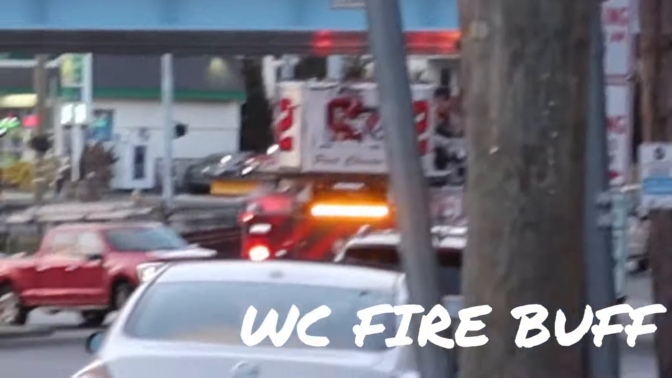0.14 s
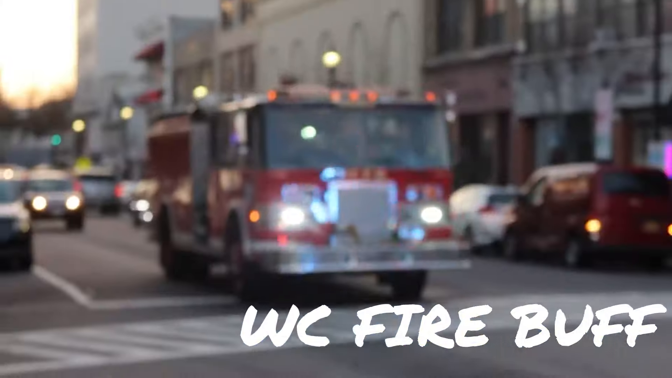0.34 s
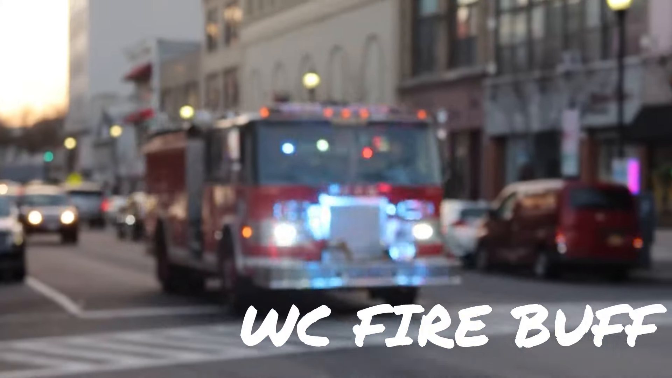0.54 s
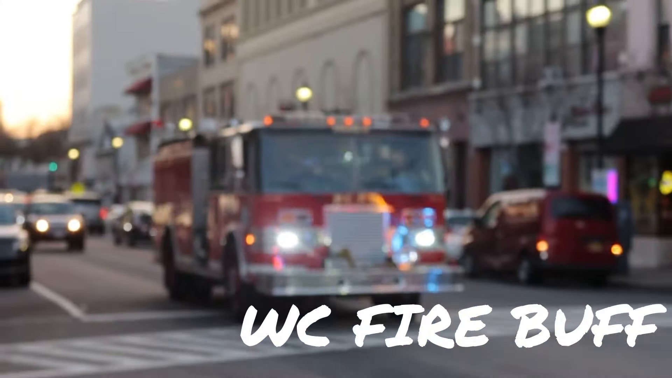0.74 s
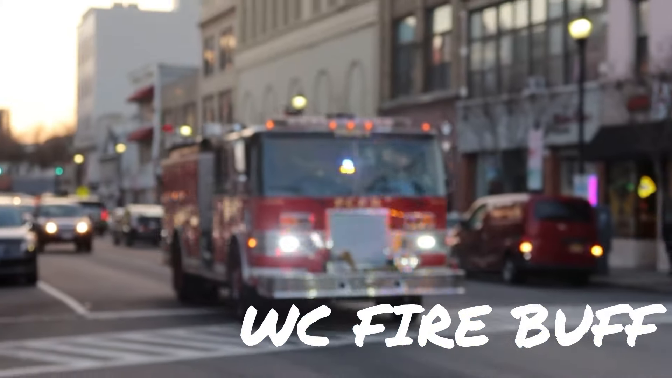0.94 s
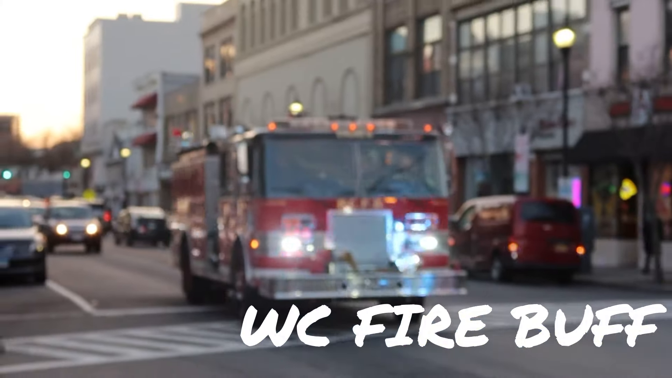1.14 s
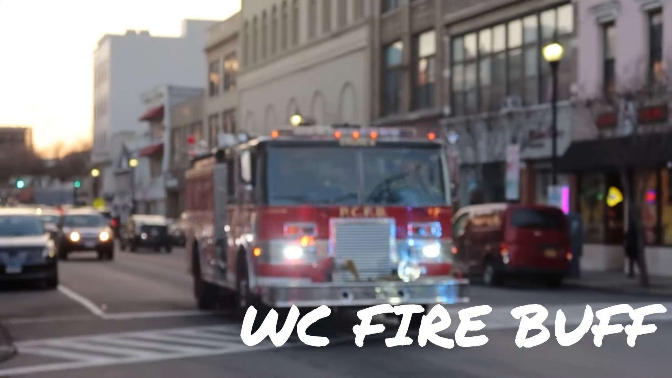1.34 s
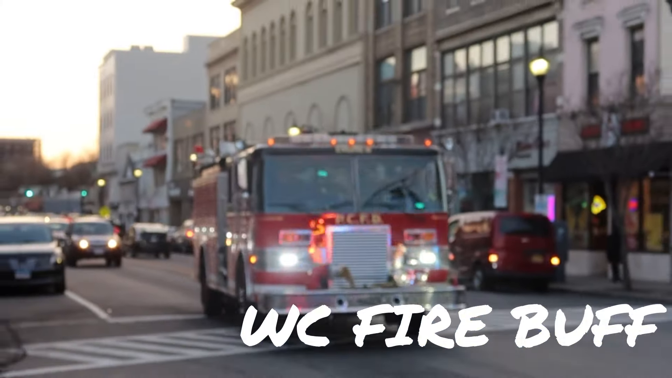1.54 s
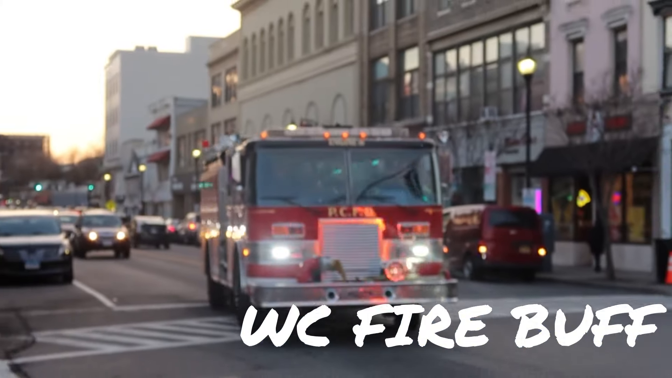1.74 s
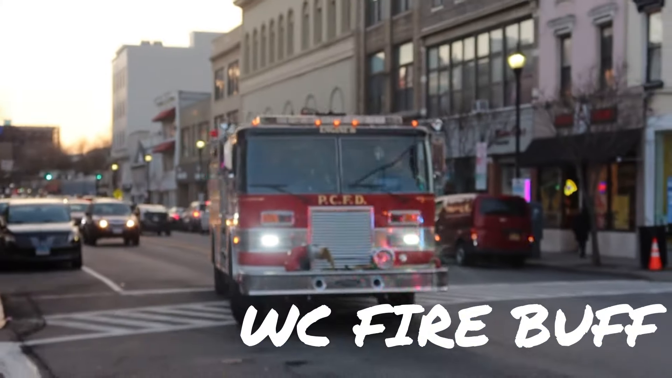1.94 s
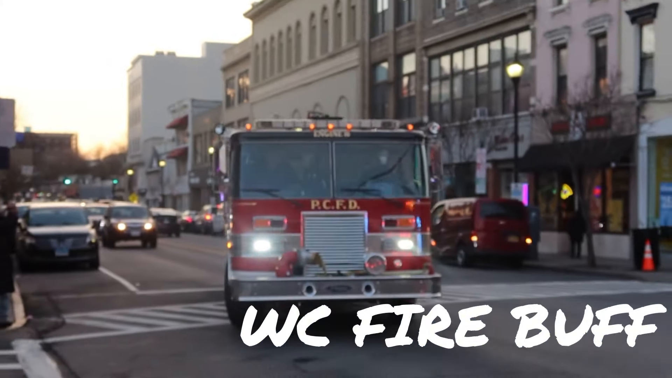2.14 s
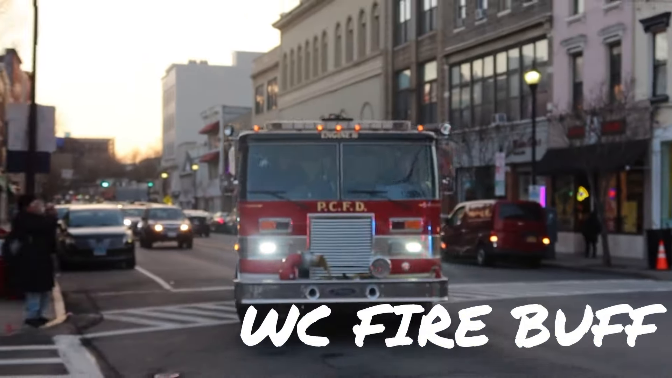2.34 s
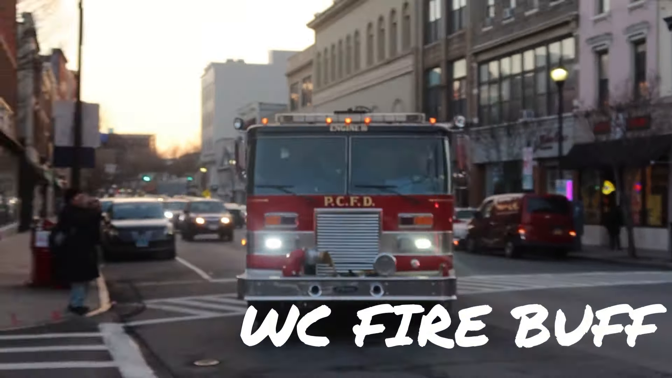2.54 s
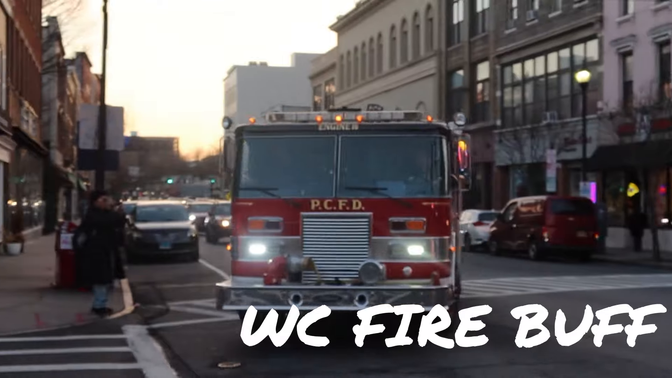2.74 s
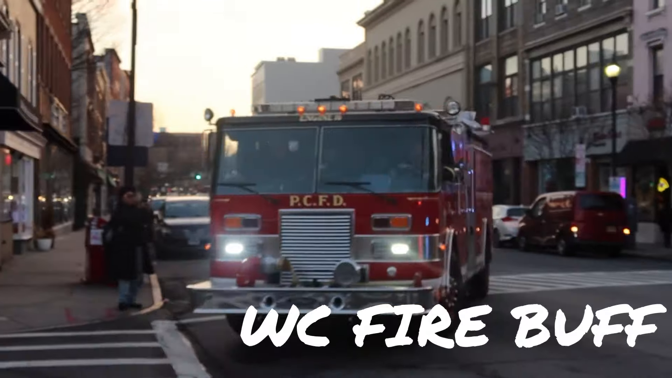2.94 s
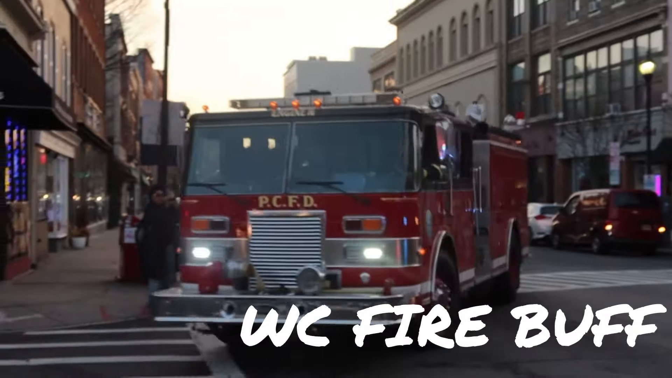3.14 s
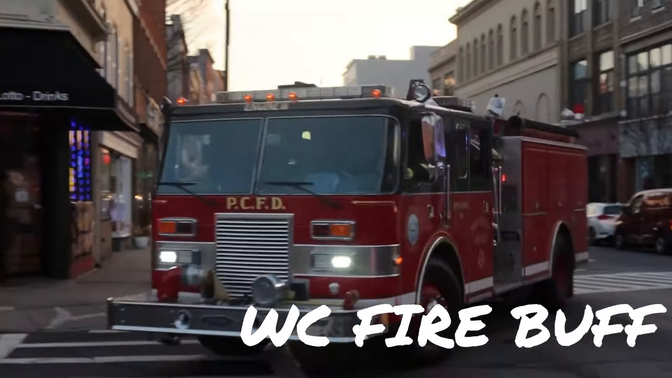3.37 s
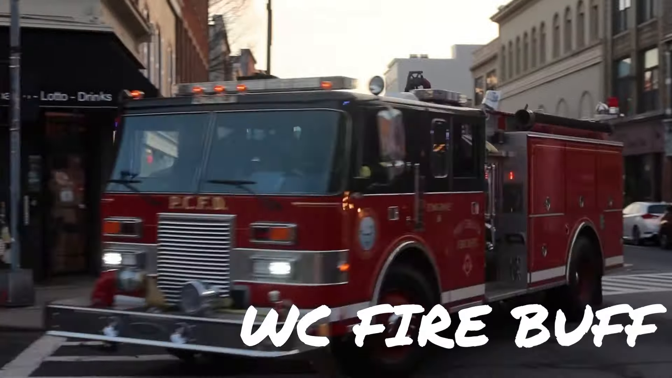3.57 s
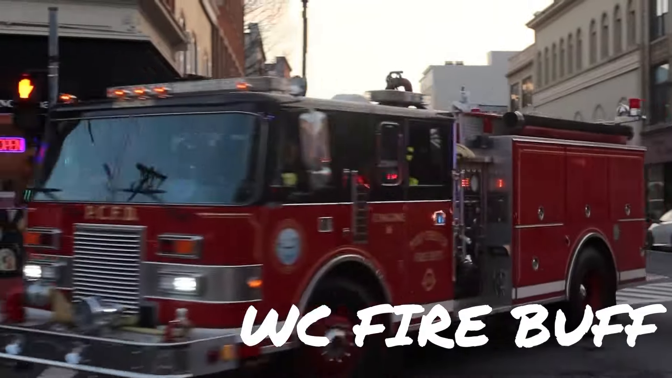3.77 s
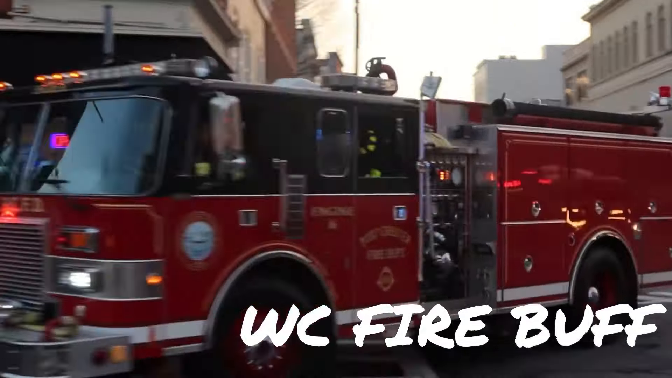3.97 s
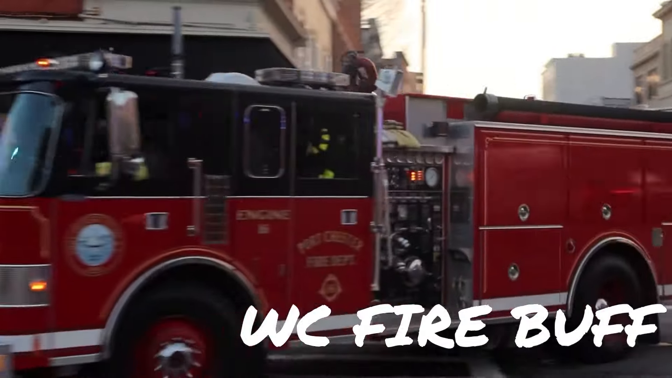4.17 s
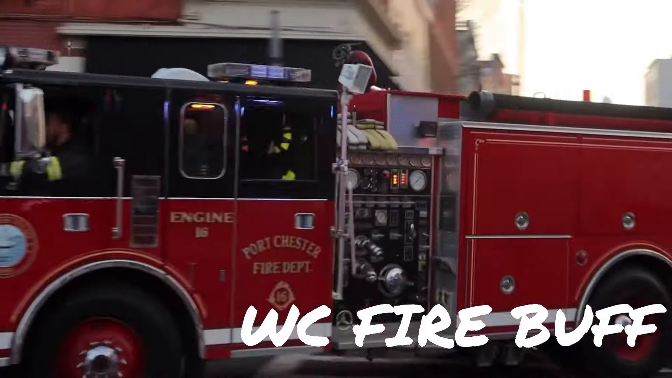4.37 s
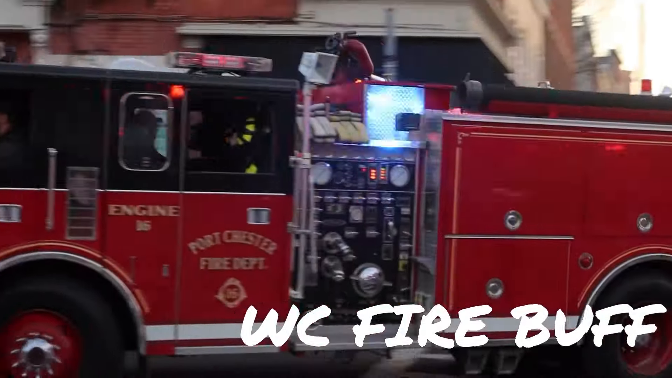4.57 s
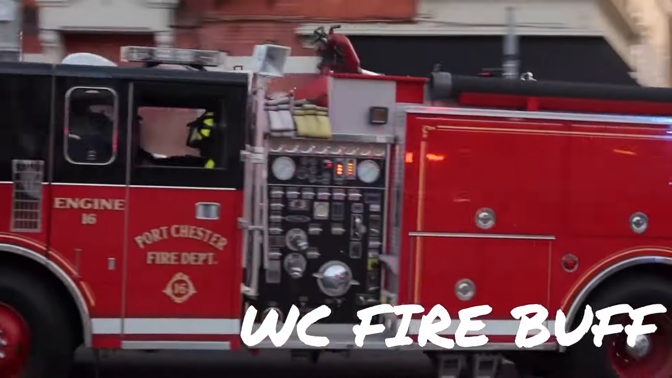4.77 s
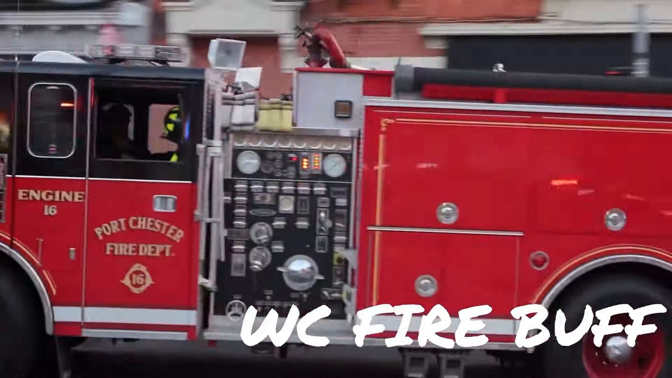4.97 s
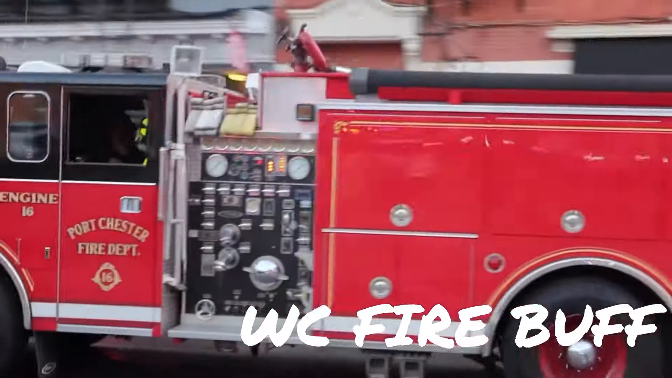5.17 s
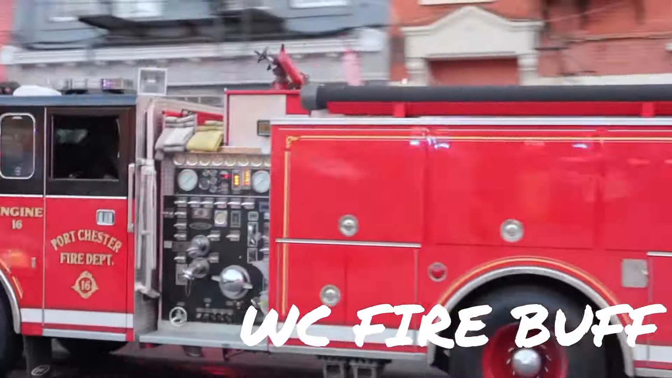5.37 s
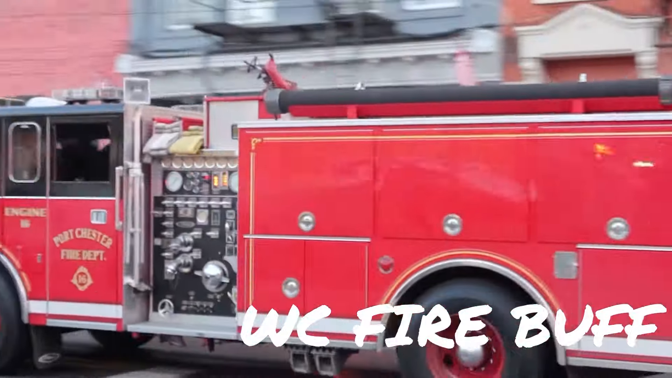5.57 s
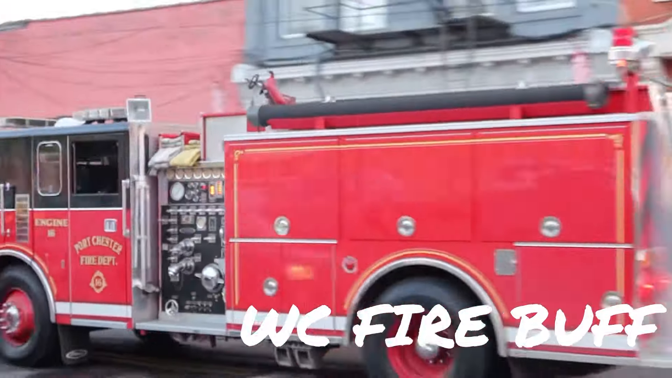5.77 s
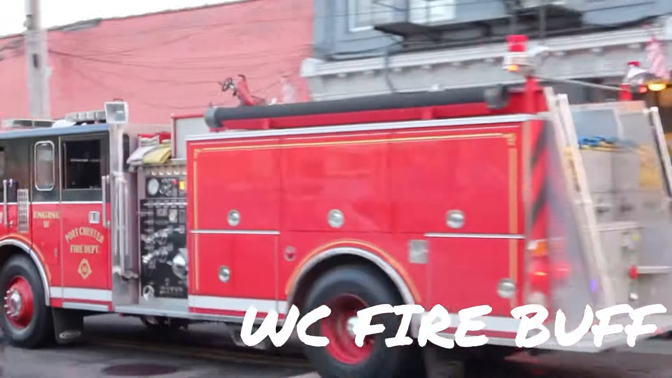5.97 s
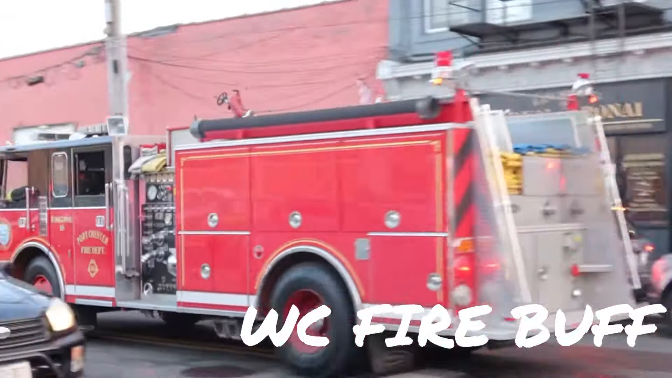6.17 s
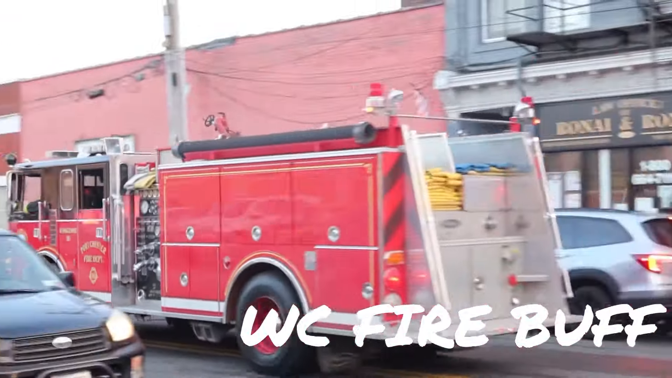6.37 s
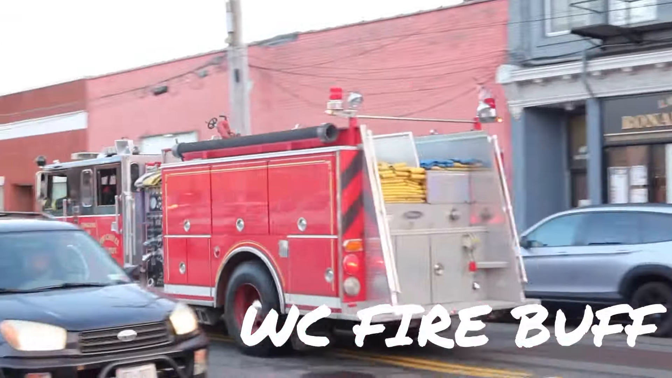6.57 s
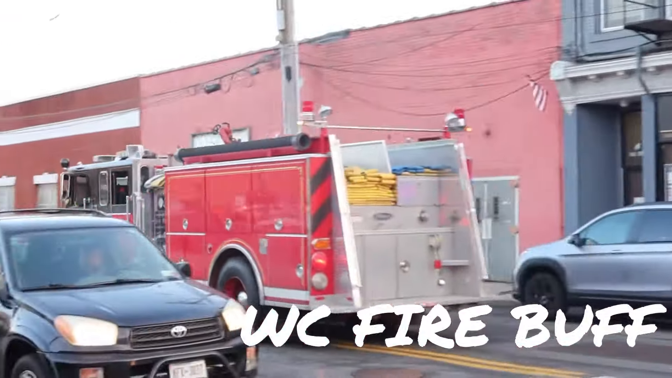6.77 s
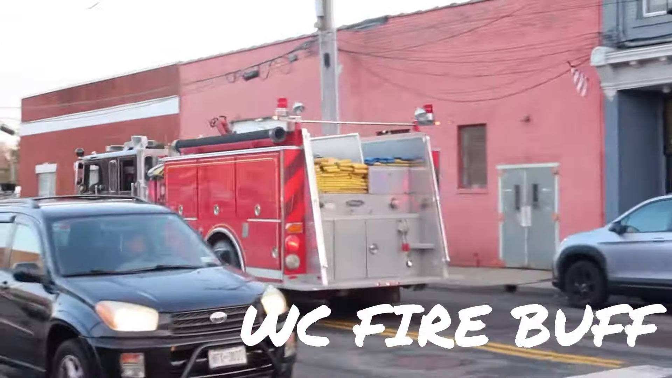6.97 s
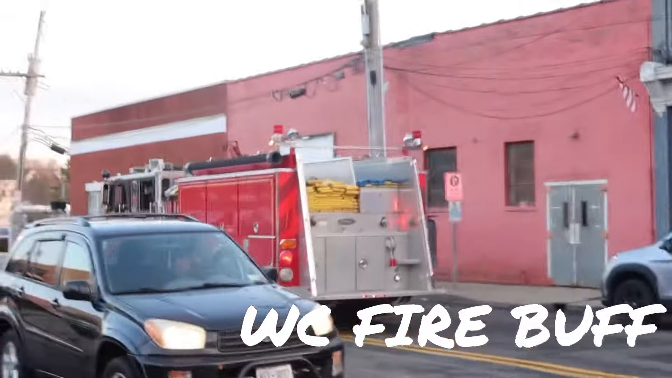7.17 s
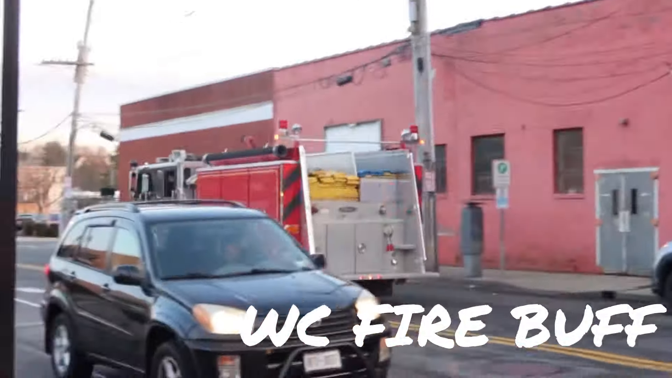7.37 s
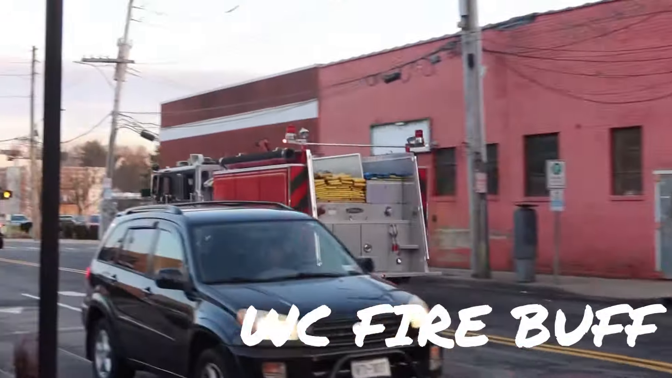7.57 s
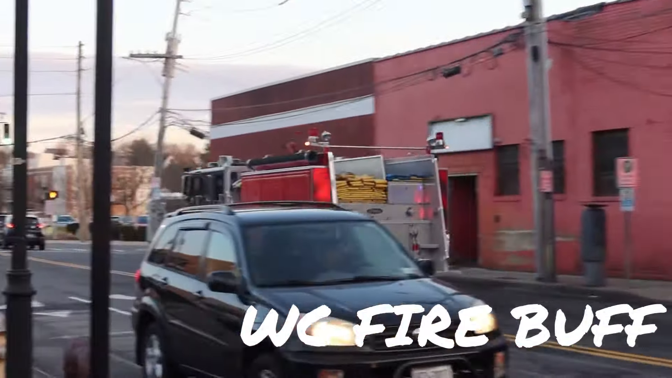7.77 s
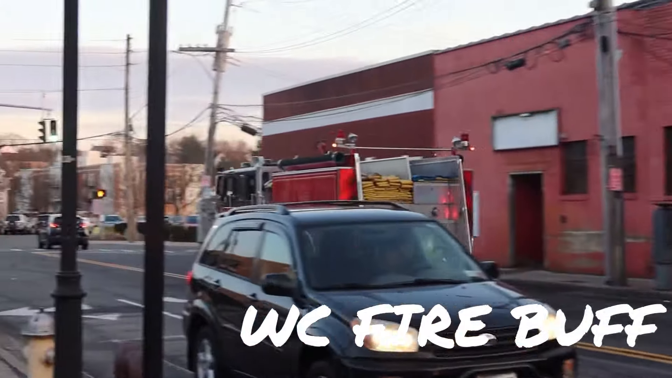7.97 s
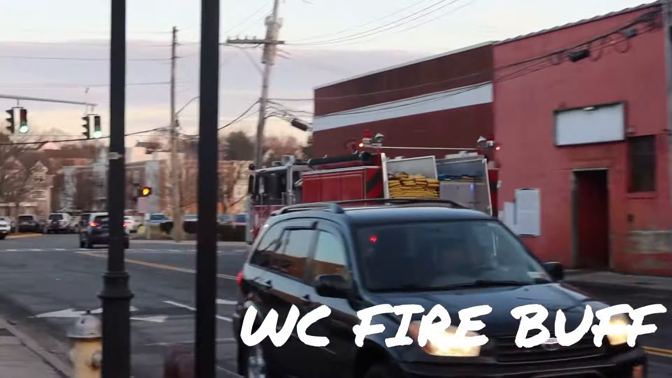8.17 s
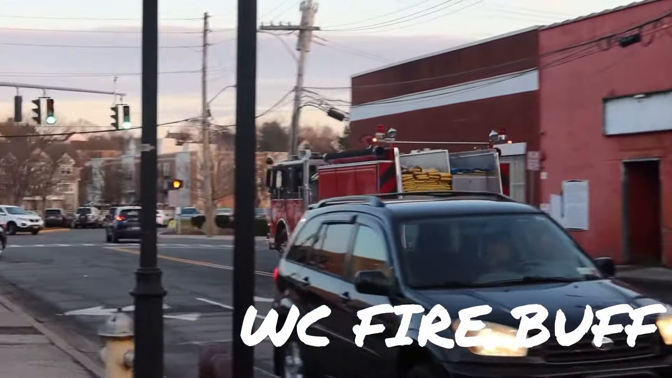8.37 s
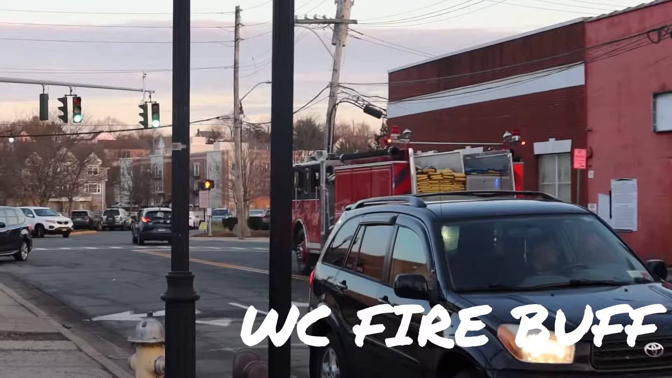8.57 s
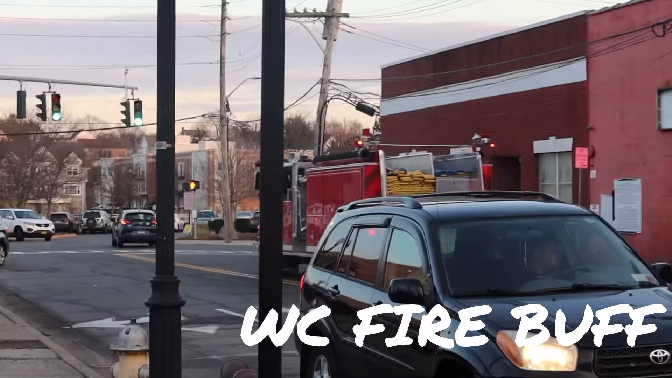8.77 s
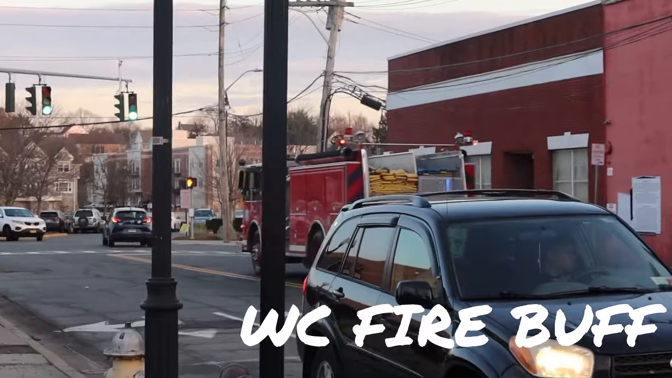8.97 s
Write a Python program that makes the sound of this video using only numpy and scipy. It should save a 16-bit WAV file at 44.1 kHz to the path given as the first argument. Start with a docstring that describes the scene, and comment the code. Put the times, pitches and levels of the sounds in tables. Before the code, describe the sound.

A short surge of traffic roar cuts to a tiny silence, then a large diesel idles and an air horn gives one quick tap. The engine revs in steps, its low exhaust boom swelling as it passes close with clatter, growl and gear song. A body panel knocks, brakes squeak faintly, and the engine slows away as a car rolls nearer. Outdoor street microphone, close to the road.

```python
"""A town street: a six-cylinder diesel fire engine pulls away, passes close by, changes gear and slows down.
A moment of filtered-noise traffic roar and a short silence come first; an air horn tap of swept partials follows.
The exhaust booms on firing harmonics, and noise pulsed or looped with the cylinders makes block, clatter and growl.
Sine partials make the turbo whistle, gear song, whines and chirps; decaying noise and tones make a body knock
and brake squeaks. Idling cars drone, and one rolls closer with humming engine and surging tyres."""
import sys
import numpy as np
from scipy import signal
from scipy.fft import rfft, irfft, next_fast_len
from scipy.io import wavfile
from scipy.ndimage import uniform_filter1d, map_coordinates

SR = 44100
rng = np.random.default_rng(int(sys.argv[2]) if len(sys.argv) > 2 else 0)


def dump_mix(stems):
    """Bounce the given channels to the path in sys.argv[1] as a 16-bit WAV at rate SR."""
    frames = np.atleast_2d(stems).T  # one column per channel
    limited = np.clip(frames, -1, 1)  # hard clip at full scale
    pcm = np.round(limited * 32767).astype(np.int16)
    wavfile.write(sys.argv[1], SR, pcm)


N = 397341
TIME = np.arange(N) / SR
CYLINDERS, FIRINGS_PER_TURN = 6, 3
# engine bay faces the listener
BAY_S, BAY_HALF_WIDTH_S = 4.8, 0.8


def amp(db):
    """Decibels to gain."""
    return 10 ** (np.asarray(db) / 20)


def unit(x):
    """Scale to rms 1."""
    return x / np.sqrt(np.mean(x ** 2) + 1e-20)


def along(points, hz):
    """Interpolate (f/Hz, value) points on a log frequency axis."""
    f, v = np.transpose(points)
    return np.interp(np.log(hz + 1), np.log(f + 1), v)


def curves(rows):
    """One value per sample for each column after the time."""
    s, *cols = np.transpose(rows)
    return [np.interp(TIME, s, c) for c in cols]


def wobble(rate_hz):
    """Smooth random curve with rate_hz knots a second."""
    knots = rng.standard_normal(int(N * rate_hz / SR) + 4)
    return map_coordinates(knots, [TIME * rate_hz], order=3)


def gate(start_s, end_s, attack_s, release_s):
    """Rise from start, hold at 1, fall from end."""
    rise = (TIME - start_s) / attack_s
    fall = 1 - (TIME - end_s) / release_s
    return np.clip(np.minimum(rise, fall), 0, 1)


def swell(middle_s, half_width_s):
    """Gaussian rise to 1 and fall; half width to 1/e."""
    return np.exp(-((TIME - middle_s) / half_width_s) ** 2)


def filtered(x, response):
    """Apply a zero-phase response(hz) in the frequency domain."""
    m = next_fast_len(N + SR // 2)
    return irfft(rfft(x, m) * response(np.fft.rfftfreq(m, 1 / SR)), m)[..., :N]


def coloured(x, spectrum):
    """Shape x with a body's spectrum, at rms 1."""
    return unit(filtered(x, lambda hz: amp(along(spectrum, hz))))


def rush(spectrum, drive=1, width=None):
    """Stereo noise of rms 1, pulsed by drive; by default narrow in the bass and wide in the treble."""
    # default stereo width: f/Hz, side over mid/dB
    default_width = [(60,-53.5), (250,-39.5), (500,-35), (1000,-30), (2000,-22), (4000,-19.5), (8000,1.5),
                     (15000,2)]
    noise = drive * rng.standard_normal((2, N))
    mid, side = filtered(noise, lambda hz: amp(along(spectrum, hz)))
    side = filtered(side, lambda hz: amp(along(width or default_width, hz)))
    return unit(np.array([mid + side, mid - side]))


def cycle_ring(firings, spectrum, size=4096):
    """A random pressure pattern that repeats with each round of the cylinders."""
    pattern = signal.resample(rng.standard_normal(size // 4), size)
    cycle = firings / CYLINDERS
    return coloured(np.interp(cycle % 1, np.arange(size) / size, pattern), spectrum)


def blows(firings, decay_firings, cylinder_db, scatter_db):
    """A sharp rise and decay at each firing; strength varies by cylinder and by firing."""
    index = firings.astype(int)
    by_cylinder = unit(rng.standard_normal(CYLINDERS))[index % CYLINDERS]
    by_firing = rng.standard_normal(N)[index]
    strength = amp(cylinder_db * by_cylinder + scatter_db * by_firing)
    return unit(strength * np.exp(-(firings % 1) / decay_firings))


def blend(clean, rough, share):
    """Constant-power mix; share is the clean part."""
    share = np.clip(share, 0, 1)
    return np.sqrt(share) * clean + np.sqrt(1 - share) * rough


def passed():
    """1 while the truck shows its rear, ramped at both ends."""
    return gate(start_s=5.48, end_s=7.57, attack_s=0.31, release_s=0.31)


def traffic_roar():
    """Broadband traffic noise surges, flares brighter once and swells in a hollow resonance."""
    # opening level: t/s, level/dB
    surge = [(0,-19.5), (.04,-17), (.052,-16), (.11,-19), (.19,-17.5), (.228,-15)]
    # roar, bright flare and hollow resonance spectra: f/Hz, level per Hz/dB
    roar_spectrum = [(24, -63), (40, -20.5), (54, -15.5), (108, -14), (138, -9), (196, -5.5), (382, -6.5),
                     (554, 0), (910, -9.5), (1080, -10.5), (1650, -14.5), (4130, -31), (10600, -61.5),
                     (15000, -91)]
    flash_spectrum = [(400, -26), (900, 0), (1500, 1), (2600, -9.5), (4000, -24), (9000, -70)]
    hollow_spectrum = [(250, -50), (450, -8), (580, 0), (720, -4), (950, -25), (2000, -70)]
    # resonance swells: t/s, half width/s, level/dB
    hollow_swells = [(.024, .016, -20.5), (.088, .011, -20.5), (.18, .03, -22), (.233, .011, -13.5)]
    # stereo width: f/Hz, side over mid/dB
    roar_width = [(60, -70), (240, -79), (950, -38), (3770, -9.5), (15000, 3)]
    body = amp(curves(surge)[0] + 1.5 * wobble(90)) * rush(roar_spectrum, width=roar_width)
    flare = amp(-21.5) * swell(0.054, 0.022) * rush(flash_spectrum, width=roar_width)
    hollow_gain = sum(amp(db) * swell(s, half_width_s) for s, half_width_s, db in hollow_swells)
    return body + flare + hollow_gain * rush(hollow_spectrum, width=roar_width)


def traffic():
    """Waiting cars drone at idle; an oncoming car adds an engine tone and tyre noise."""
    # street rumble: t/s, level/dB
    rumble_level = [(.3,-33), (1.2,-23.5), (1.65,-17.5), (2.1,-29), (3.2,-32), (7.7,-29.5), (8.5,-23.5),
                    (9,-30.5)]
    # rumble and tyre spectra: f/Hz, level per Hz/dB
    rumble_spectrum = [(20, -26.5), (40, -2), (58, 8.5), (70, 15), (85, 10), (110, 17), (180, -39),
                       (600, -120)]
    tyre_spectrum = [(150, -4), (450, 4), (700, 0.5), (1500, -8), (2700, -15), (4200, -28.5), (6800, -29),
                     (10000, -55.5), (14000, -90)]
    # oncoming engine: t/s, f/Hz, level/dB
    car = [(6.6, 218, -47), (7.3, 213, -34), (7.5, 210, -25), (7.9, 212, -27), (8.25, 195, -32),
           (8.65, 203, -24.5), (9, 180, -20.5)]
    # tyre level: t/s, level/dB
    tyre_roll = [(6.7, -58), (7.35, -44), (7.48, -36), (7.75, -43), (8.1, -38.5), (8.6, -33), (9, -33)]
    idle = np.sqrt(2) * np.sin(2 * np.pi * 71 * TIME + 1.3 * wobble(7))
    hz, db = curves(car)
    hum_gain = amp(db + 3.8 * wobble(16))
    hum = hum_gain * np.sin(2 * np.pi * np.cumsum(hz) / SR + 0.5 * wobble(16))
    tyres = amp(curves(tyre_roll)[0] + 2 * wobble(14)) * rush(tyre_spectrum)
    drone = amp(curves(rumble_level)[0]) * blend(idle, rush(rumble_spectrum), share=0.28)
    return drone + hum + tyres


def exhaust(firing_hz, firings, engine_db):
    """The pipe booms on low firing harmonics; unequal cylinders growl in between."""
    # 2nd firing harmonic: t/s, level/dB
    boom_level = [(.33,-36.5), (1.05,-33), (1.3,-24), (1.68,-24), (1.83,-16), (2.45,-12.5), (2.78,-6.5),
                  (3.03,-11), (3.2,-1), (3.36,-1.5), (3.65,-8), (4.16,-3), (4.25,-10), (4.29,-18.5),
                  (4.68,-22), (4.87,-8), (5.2,1), (5.45,-4), (5.72,-3), (6.15,-5.5), (6.6,-13), (6.8,-20.5),
                  (7.55,-28), (7.75,-20), (7.9,-25), (8.45,-14.5), (9,-33)]
    # brief boom dips: t/s, depth/dB, half width/s
    dips = [(1.98,17,0.024), (2.95,7,0.013), (3.075,8.5,0.036), (3.53,12,0.078), (5.04,14,0.055),
            (5.4,4.5,0.055), (5.59,2.5,0.027), (5.87,3,0.042), (6.09,3.5,0.036), (6.255,15,.027)]
    # throttle pushes: start/s, end/s, overtone lift at the pipe resonance/dB
    pushes = [(1.16, 1.274, 17), (1.54, 1.7, 11), (1.756, 1.92, 13)]
    # pipe response to overtones: f/Hz, gain over engine level/dB
    pipe_gain = [(110,-6), (150,2.5), (195,3), (235,3), (285,-3), (330,5.5), (400,-3), (520,-3.5)]
    # extra response with the tailpipe towards the listener: f/Hz, gain/dB
    tailpipe = [(130, 0), (195, 5.5), (240, 7), (295, 1), (335, 0), (385, 8.5), (445, 1), (510, 11),
                (600, 2), (670, 8)]
    # overtones: firing harmonic/1, level/dB, share of boom swell followed/1
    overtone_rows = [(3, 0.5, 0), (4, -2, 0.41), (5, -7.5, 0.42), (6, -15, 0.4), (7, -15, .3), (8, -17, .3),
                     (9, -20, .3)]
    # growl spectrum: f/Hz, level per Hz/dB
    growl_spectrum = [(50, -26), (100, -10), (150, 3.5), (200, -6), (270, -8.5), (380, -15.5), (600, -26.5),
                      (2500, -120)]
    resonance_hz, resonance_width_hz = 162.6, 51
    cruise_db = 14.5  # boom over engine level at a steady pull
    steady_push_db = 8  # a push of this size overrides most of the fading
    growl_db, growl_push_share = 3.5, 0.25

    def harmonic(order, drift_rad):
        phase = 2 * np.pi * (order * firings + rng.random())
        return np.sqrt(2) * np.sin(phase + drift_rad * wobble(22))

    push_db = sum(db * gate(start, end, attack_s=0.06, release_s=0.08) for start, end, db in pushes)
    dip_db = sum(db * swell(s, half_width_s) for s, db, half_width_s in dips)
    flutter_db = 1.3 * wobble(16)
    boom_db = curves(boom_level)[0]
    boom = amp(boom_db - dip_db + flutter_db) * harmonic(2, drift_rad=0.064)

    swell_db = boom_db - engine_db - cruise_db
    rear = passed()
    # house-front echoes make the overtones swell and fade
    fading_db = 3.4 * np.exp(-push_db / steady_push_db)
    overtones = 0
    for order, db, share in overtone_rows:
        hz = order * firing_hz
        pushed_db = push_db * np.exp(-((hz - resonance_hz) / resonance_width_hz) ** 2)
        pipe_db = along(pipe_gain, hz) + pushed_db + rear * along(tailpipe, hz)
        flicker_db = -fading_db * wobble(9) ** 2 + 1.4 * wobble(30)
        gain = amp(db + share * swell_db + pipe_db + flicker_db)
        overtones = overtones + gain * harmonic(order, drift_rad=0.33)

    growl = blend(cycle_ring(firings, growl_spectrum), rush(growl_spectrum), share=0.42)
    growl = amp(growl_db + growl_push_share * push_db) * growl
    return boom + amp(engine_db) * (overtones + growl)


def machinery(firings, engine_db, treble_db):
    """Combustion shakes the block, injectors tick and hiss, and the injection pump rings grittily."""
    # body spectra: f/Hz, level per Hz/dB
    block_spectrum = [(150, -37), (280, 0.5), (450, -1), (620, 1.5), (800, -2), (1050, -2.5), (1350, -8.5),
                      (2000, -19.5), (4000, -49), (9000, -120)]
    clatter_spectrum = [(300, -60.5), (800, -11.5), (1300, -1), (1700, 0.5), (2400, -2.5), (3300, -5),
                        (4300, -7.5), (5200, -21), (7500, -27.5), (12000, -120)]
    hiss_spectrum = [(1000, -66.5), (3000, -28.5), (5000, 4.5), (6800, -5), (8500, -9), (11000, -16),
                     (15000, -27)]
    pump_spectrum = [(900, -51), (1400, -12.5), (1650, -0.5), (1850, -3), (2200, -18), (3800, -12),
                     (4600, -15), (6000, -60.5)]
    block_db, clatter_db, hiss_db, pump_db = 0.6, -7, -25.5, -13  # over engine level
    # diesel knock flares as the load comes on
    flare_s, flare_db, flare_attack_s, flare_release_s = 1.58, 5.5, 0.017, 0.25
    flare = gate(flare_s - flare_attack_s, flare_s, flare_attack_s, flare_release_s)
    thuds = rush(block_spectrum, blows(firings, decay_firings=1.8, cylinder_db=0.5, scatter_db=0.5))
    block = blend(cycle_ring(firings, block_spectrum), thuds, share=0.27)
    ticks = blows(firings, decay_firings=6.2, cylinder_db=0.17, scatter_db=0.9)
    clatter = blend(cycle_ring(firings, clatter_spectrum), rush(clatter_spectrum, ticks), share=0.18)
    hiss = amp(hiss_db + treble_db) * rush(hiss_spectrum, ticks)
    pump_gain = amp(pump_db + 2.2 * wobble(14)) * swell(BAY_S, BAY_HALF_WIDTH_S)
    pump = pump_gain * blend(cycle_ring(firings, pump_spectrum), rush(pump_spectrum, ticks), share=0.3)
    mix = amp(block_db) * block + amp(clatter_db) * clatter + hiss + pump
    return amp(engine_db + flare_db * flare) * mix


def gears(firing_hz, engine_db):
    """Fan and gears sing at multiples of the crank rate, loudest at middling speed."""
    # low fan and gear tones: multiples of crank rate/1
    orders = [10, 16, 24, 26]
    # housing response: f/Hz, gain/dB
    housing = [(230,-1), (370,2), (500,-11), (610,-6), (760,-15.5)]
    # song level: firing rate f/Hz, level over engine level/dB
    gear_song = [(40,-19.5), (63,-11), (68,-2), (70.5,-4), (72.5,-7.5), (76,-10), (83,-14)]
    shaded_db = -6.5  # the body screens the tones once the truck has passed
    crank_hz = firing_hz / FIRINGS_PER_TURN
    turns = np.cumsum(crank_hz) / SR
    tones = 0
    for order in orders:
        gain = amp(along(housing, order * crank_hz) + 2 * wobble(4))
        tones = tones + gain * np.sin(2 * np.pi * order * turns + 0.2 * wobble(10))
    return amp(engine_db + along(gear_song, firing_hz) + shaded_db * passed()) * tones


def turbo():
    """The turbine whistles on three unsteady shaft partials, the third only beside the engine bay."""
    # shaft: t/s, f/Hz, fundamental level/dB, octave level/dB
    shaft = [(3.2,4520,-63,-79), (4.05,5137,-53,-68), (4.5,4900,-54,-71), (4.8,4776,-51,-66),
             (5.12,5080,-50,-64), (5.25,4300,-49,-80), (5.7,4400,-45,-80), (6.5,3896,-52,-84),
             (7,3900,-63,-72), (7.42,3580,-61,-64), (7.7,3330,-60,-62), (8,2940,-60,-66),
             (8.5,2800,-67,-80)]
    hz, shaft_db, octave_db = curves(shaft)
    phase = 2 * np.pi * np.cumsum(hz * (1 + 0.009 * wobble(900))) / SR
    third_gain = amp(-64.5) * swell(BAY_S, BAY_HALF_WIDTH_S) ** 2
    gains = [amp(shaft_db), amp(octave_db), third_gain]
    return sum(gain * amp(3 * wobble(22)) * np.sin(order * phase) for order, gain in enumerate(gains, 1))


def horn():
    """Air spits and the reed speaks, flutters, blares and sags in pitch as pressure drops."""
    # upper partials: harmonic/1, level/dB
    blare_rows = [(2, -14), (3, -26), (4, -28), (5, -29), (6, -34.5), (7, -35.5)]
    # air spit spectrum: f/Hz, level per Hz/dB
    valve_spectrum = [(1000, -44), (5000, 5), (8000, -1), (15000, -16)]
    start_hz, sag_hz_per_s, low_hz = 608, 1450, 525
    flutter_hz, flutter_depth = 45, 0.7
    age_s = TIME - 0.629

    def tap(rise_db_per_s, fall_db_per_s, lag_s=0):
        late_s = age_s - lag_s
        return amp(np.minimum(rise_db_per_s * late_s, -fall_db_per_s * late_s))

    hz = np.maximum(start_hz - sag_hz_per_s * np.maximum(age_s, 0), low_hz)
    phase = 2 * np.pi * np.cumsum(hz) / SR
    flutter = 1 - flutter_depth * np.sin(np.pi * flutter_hz * (age_s - 0.002)) ** 2
    base = amp(-1.5) * tap(900, 235) * flutter * np.sin(phase)
    upper = sum(amp(db + 3.5 * wobble(140)) * np.sin(order * phase + 0.7 * wobble(350))
                for order, db in blare_rows)
    blare = tap(1000, 300, lag_s=0.008) * upper  # upper partials peak later
    spit = amp(-38) * tap(652.5, 304) * rush(valve_spectrum)
    return base + blare + spit


def street(x):
    """House fronts return a diffuse noise tail whose decay time depends on frequency."""
    # reverberation: f/Hz, t60/s
    decay = [(150, 0.38), (1000, 0.37), (8000, 0.87)]
    hz, t, z = signal.stft(rng.standard_normal(SR // 2), SR, nperseg=256)
    fade = amp(-60 * t / along(decay, hz)[:, None])
    tail = signal.istft(z * fade, SR, nperseg=256)[1]
    return signal.fftconvolve(x, tail[None] / np.linalg.norm(tail), axes=1)[:, :N]


def whines(firings):
    """Gearbox teeth whine in rough, broken stretches under load."""
    # stretches: start/s, end/s, multiple of crank rate/1, level/dB
    stretches = [(1.87, 2.25, 66, -41), (2.05, 2.65, 45, -33), (2.2, 2.62, 39, -37), (4.4, 4.65, 36, -39),
                 (4.66, 4.93, 36, -30), (4.75, 4.95, 63, -41)]
    turns = firings / FIRINGS_PER_TURN
    total = 0
    for start, end, order, db in stretches:
        gain = amp(db + 2 * wobble(24)) * gate(start, end, attack_s=0.07, release_s=0.06)
        total = total + gain * np.sin(2 * np.pi * order * turns + 0.3 * wobble(30))
    return total


def rasp(firings, engine_db):
    """Alongside the truck, upper firing harmonics come through, each fluctuating on its own."""
    # side partials: firing harmonic/1, level over engine level/dB
    partials = [(5, -14.5), (6, -14), (7, -15.5), (8, -12.5), (8.5, -14), (9, -17), (10, -17), (11, -18.5),
                (12, -20), (13, -21)]
    stack = 0
    for order, db in partials:
        gain = amp(db + 2.5 * wobble(5.5))
        phase = 2 * np.pi * (order * firings + rng.random()) + 0.5 * wobble(20)
        stack = stack + gain * np.sin(phase)
    return amp(engine_db) * swell(4.95, 1.6) * stack


def chirps():
    """Belts and springs chirp as short tones of wavering phase."""
    # chirps: t/s, length/s, f/Hz, level/dB
    chirp_rows = [(3.63, 0.12, 2734, -41), (3.88, .06, 2660, -45), (4.3, .1, 1630, -41),
                  (4.77, .1, 9950, -62)]
    total = 0
    for s, length_s, hz, db in chirp_rows:
        tone = np.sin(2 * np.pi * hz * TIME + 0.7 * wobble(90))
        total = total + amp(db) * gate(s, s + length_s, attack_s=0.02, release_s=0.03) * tone
    return total


def rattles():
    """Loose body panels knock over a bump as decaying noise; brake drum modes squeak twice."""
    # panel hits: t/s, level/dB
    knock_rows = [(5.710, -10.5), (5.7212, -15.5)]
    # panel spectrum: f/Hz, level per Hz/dB
    panel_spectrum = [(100, -10), (400, -4), (620, 10), (880, -1), (1250, 0), (2200, -10), (4600, -12),
                      (6000, -38), (15000, -55)]
    # brake squeaks: t/s, level/dB
    squeak_rows = [(6.69, -51), (6.79, -52.5)]
    # drum modes: f/Hz, level/dB, t60/s
    drum = [(9730, 0, 0.39), (10690, 2, 0.13), (14850, -16.5, .2)]

    def fade(s, t60_s, attack_s):
        age_s = np.maximum(TIME - s, 0)
        return amp(-60 * age_s / t60_s) * (1 - np.exp(-age_s / attack_s))

    hits = sum(amp(db) * fade(s, t60_s=0.084, attack_s=0.00065) for s, db in knock_rows)
    knocks = rush(panel_spectrum) * hits
    squeaks = 0
    for s, db in squeak_rows:
        for hz, mode_db, t60_s in drum:
            tone = np.sin(2 * np.pi * hz * TIME + 1.6 * wobble(400))
            squeaks = squeaks + amp(db + mode_db) * fade(s, t60_s, attack_s=0.0044) * tone
    return knocks + squeaks


def scene():
    """Traffic roar, a short silence, then the truck over the rumble of the street."""
    # truck nearing and leaving: t/s, level/dB, extra treble/dB
    engine = [(.33,-26.7,-5.5), (1.5,-26,-7), (1.7,-26,-0.5), (2.7,-26.2,3.5), (3.15,-25,5.5),
              (3.9,-24,4.2), (4.35,-26.5,5), (5.05,-24,6), (5.25,-21.2,6), (5.7,-23.7,5), (6.2,-27.2,3),
              (6.9,-32,-1.5), (9,-31,-3)]
    # engine speed: t/s, firing rate f/Hz
    speed = [(.33,38.51), (1.05,38.37), (1.33,53.13), (1.57,48.48), (1.8,58.73), (2.04,67.04), (2.74,70.68),
             (3.09,80.84), (3.7,86.73), (4.1,81.9), (4.34,70.9), (4.8,72), (4.97,75.4), (5.19,79.7),
             (5.65,84.4), (5.83,80.87), (6.43,73.36), (6.9,63.82), (7.5,64.44), (8.15,46.09), (9,36.57)]
    # silence: roar end t/s, fade-in start t/s, fade-in end t/s
    silence = (.241, .308, .33)
    stop_s = 0.0004
    engine_db, treble_db = curves(engine)
    firing_hz = curves(speed)[0]
    firings = np.cumsum(firing_hz) / SR
    song = gears(firing_hz, engine_db)
    truck = song + exhaust(firing_hz, firings, engine_db) + machinery(firings, engine_db, treble_db)
    truck = truck + rasp(firings, engine_db) + whines(firings) + turbo()
    accents = horn() + rattles() + chirps()
    passing = truck + accents + amp(-11) * street(accents) + traffic()
    roar_gate = np.clip((silence[0] - TIME) / stop_s, 0, 1)
    passing_fade = np.interp(TIME, silence[1:], [0, 1])
    return traffic_roar() * roar_gate + passing * passing_fade


def record(dry):
    """Loud passages pull the gain down at once, it recovers slowly; a steep low-pass follows."""
    ceiling_db, recover_db_per_s, detect_s, top_hz = -8.5, 2.5, 0.032, 15200
    size = int(detect_s * SR)
    power = np.abs(uniform_filter1d(np.mean(dry ** 2, axis=0), size))
    level_db = 10 * np.log10(power + 1e-12)
    excess_db = np.maximum(level_db - ceiling_db, 0)
    # a running maximum against a rising ramp makes each cut decay linearly in dB
    recovery_db = recover_db_per_s * TIME
    cut_db = np.maximum.accumulate(excess_db + recovery_db) - recovery_db
    levelled = dry * amp(-uniform_filter1d(cut_db, size))
    return filtered(levelled, lambda hz: hz < top_hz)


dry = scene()
out = record(dry)
dump_mix(out)
```